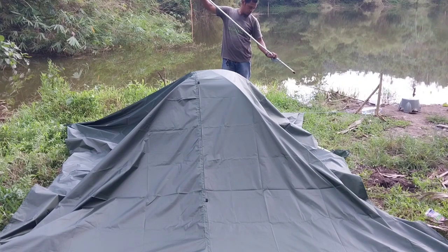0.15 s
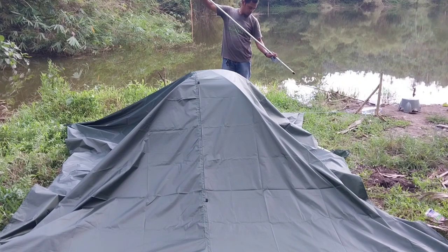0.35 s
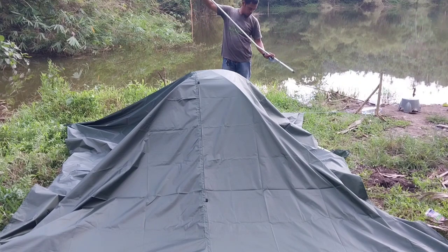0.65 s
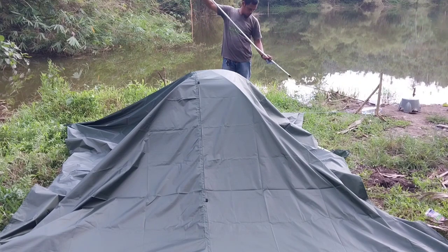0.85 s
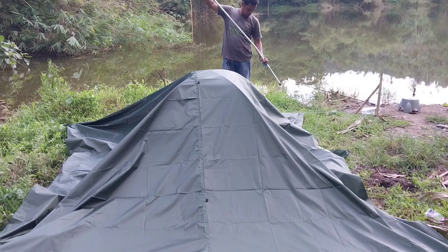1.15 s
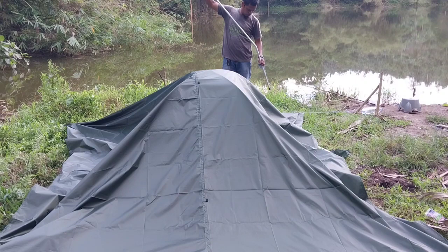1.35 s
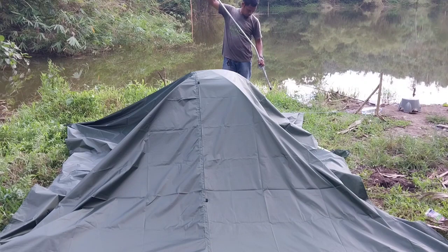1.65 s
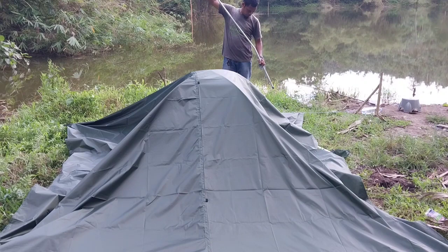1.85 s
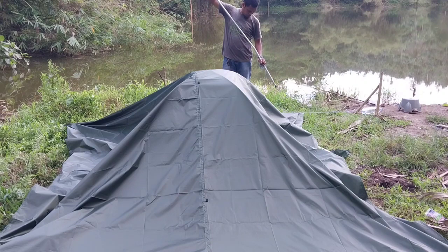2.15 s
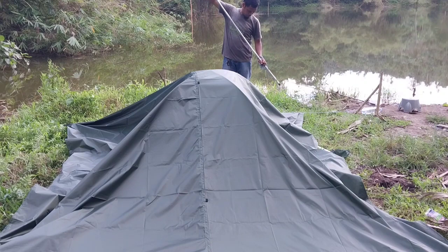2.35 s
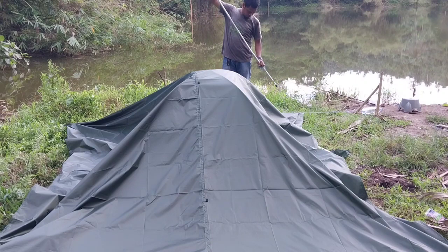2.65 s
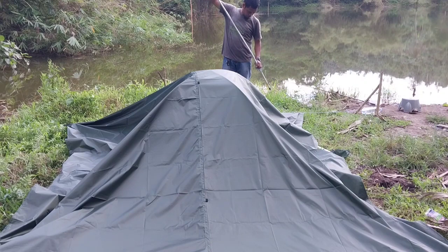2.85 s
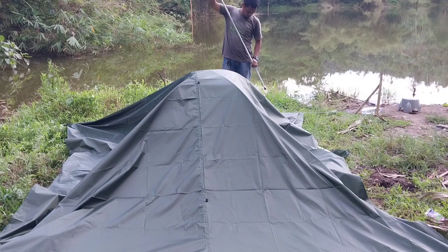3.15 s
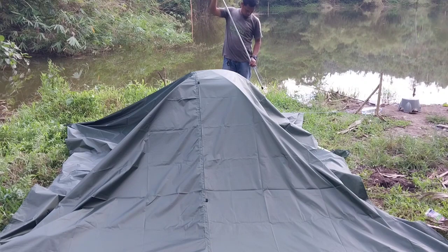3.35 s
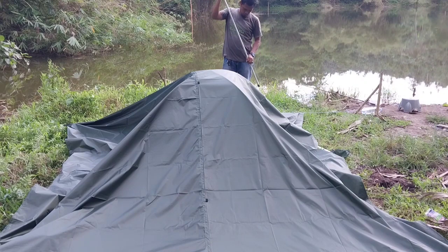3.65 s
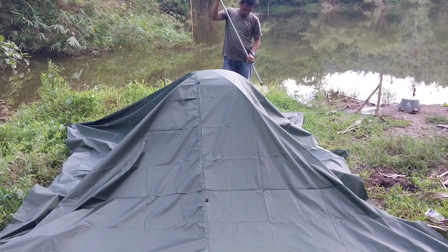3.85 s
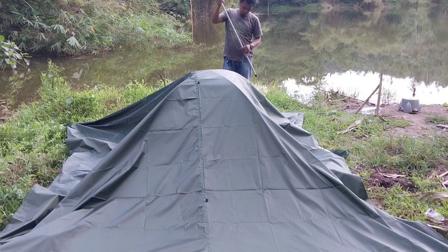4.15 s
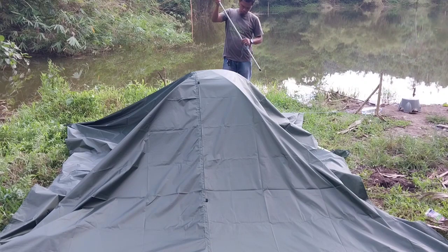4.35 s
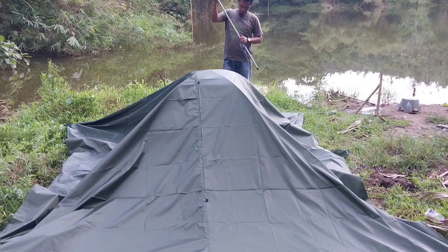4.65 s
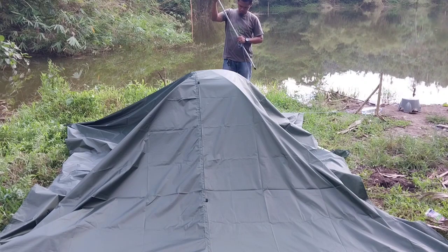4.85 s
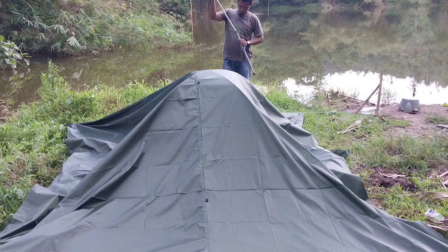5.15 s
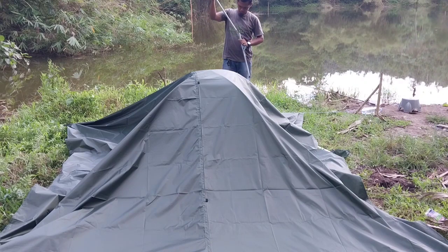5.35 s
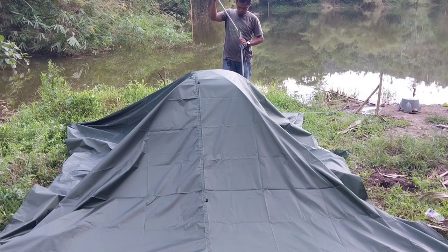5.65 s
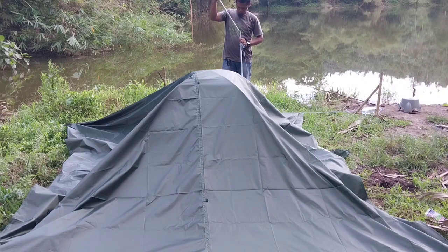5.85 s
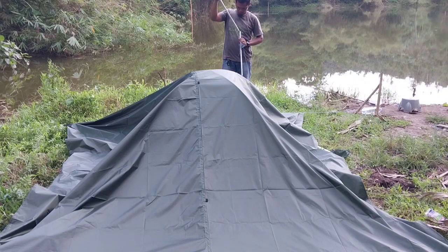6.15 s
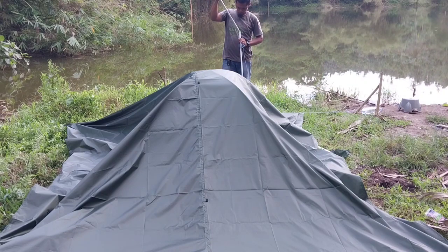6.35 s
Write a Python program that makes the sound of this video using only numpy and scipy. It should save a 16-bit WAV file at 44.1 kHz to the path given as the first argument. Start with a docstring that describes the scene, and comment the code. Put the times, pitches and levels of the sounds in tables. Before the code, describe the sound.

Outdoors at a lake shore, a bright cicada drone leans to one side over soft hiss, with a regular two-tone insect call and fine chirps. Tent pole sections snap together sharply near the start, again a second later, more dully midway, and crisply near the end. A rasping insect joins and pulses ever faster. Stereo microphone a few metres away, with a short echo from the trees.

```python
"""A lake shore in summer heat: from the start cicadas drone to the right in scattered clicks, over filtered-noise
hiss; other insects chirp and buzz, and a two-tone caller (grouped bursts) keeps time. Thin whistles (sines)
come and go from about 1.15 s. From about 1.2 s tent pole sections rub (soft noise) and snap together near 1.4, 2.4,
3.5 and 5.8 s: noise through joint and tube resonances, damped modes for the thuds, a noise tail for the trees'
answer. A pulsing rasper (noisy bursts) joins at about 2.6 s, its pulses drawing closer together."""
import sys
import numpy as np
from scipy import signal
from scipy.fft import rfft, irfft, next_fast_len
from scipy.io import wavfile
from scipy.ndimage import uniform_filter1d, map_coordinates

SR = 44100
rng = np.random.default_rng(int(sys.argv[2]) if len(sys.argv) > 2 else 0)


def to_wav(sig):
    """Store sig (one row per channel, or 1-D mono) as 16-bit WAV at the path in sys.argv[1].

    Samples outside -1..1 are clipped; the rate is SR.
    """
    pcm = np.clip(np.atleast_2d(sig), -1, 1) * 32767
    pcm = np.round(pcm).astype(np.int16)
    wavfile.write(sys.argv[1], SR, pcm.T)  # frames by channels


N = 287091


def amp(db):
    """Gain for a level in dB."""
    return 10 ** (np.asarray(db) / 20)


def unit(x):
    """x scaled to an RMS of one."""
    return x / np.sqrt(np.mean(x ** 2) + 1e-20)


def along(points, hz):
    """Each column after the frequency, read on a log axis."""
    f, *cols = np.transpose(points)
    return [np.interp(np.log(hz + 1), np.log(f + 1), c) for c in cols]


def curves(rows):
    """One value per sample for each column after the time."""
    s, *cols = np.transpose(rows)
    return [np.interp(np.arange(N) / SR, s, c) for c in cols]


def sides(db):
    """Left and right gain for a level difference; negative leans right."""
    return amp([[db / 2], [-db / 2]])


def filtered(x, response):
    """x times a complex response of frequency."""
    m = next_fast_len(x.shape[-1] + 8192)
    spectrum = rfft(x, m) * response(np.fft.rfftfreq(m, 1 / SR))
    return irfft(spectrum, m)[..., :x.shape[-1]]


def resonances(modes):
    """Causal response of a few (f/Hz, width/Hz, level/dB) modes, alternating in sign."""
    def response(f):
        total = 0
        for k, (centre, width, db) in enumerate(modes):
            damping = 1j * f * width
            total = total + (-1) ** k * amp(db) * damping / (centre * centre - f * f + damping)
        return total
    return response


def drift(depth_db):
    """A slow random swell of level, in dB, splined through random knots."""
    knots_per_s = 3
    knots = rng.standard_normal(int(N * knots_per_s / SR) + 4)
    return depth_db * map_coordinates(knots, [np.arange(N) * knots_per_s / SR])


def phrases(rows, length):
    """Gain of a song that starts and stops: round-shouldered swells centred on each (t/s, level/dB)."""
    t = np.arange(N) / SR
    return sum(amp(db) * np.exp(-(2 * (t - s) / length) ** 4) for s, db in rows)


def shore():
    """Distant insects, leaves and rumble merge into a gently patchy hiss of shaped noise."""
    # spectrum of the far shore: f/Hz, relative level/dB per Hz, left-right/dB, left-right likeness (-1 to 1)
    far_spectrum = [(15, -30, 0, .2), (29.8, 1.5, -4, 0.22), (70.6, 4, -1.5, 0.21), (226, -1, 0, 0.15),
                    (440, -11, -1.5, 0.21), (1480, -13.5, -1, -0.34), (1823, 0.5, 2, 0.18),
                    (2550, -9.5, 4, 0.4), (3750, 1, -1, 0.27), (4350, 6, -2.5, -0.025),
                    (6430, 2.5, -0.5, 0.051), (10500, 0.5, -4.5, -0.063), (16200, 2.5, 1.5, 0.14)]
    mean_db, drift_db = -43.5, 0.78
    z = signal.stft(rng.standard_normal((2, N)), nperseg=512)[2]
    # patches: random levels smoothed over frequency, then over time
    patches = uniform_filter1d(rng.standard_normal(z.shape[1:]), 4, 0)
    patches = uniform_filter1d(patches, 10, 1)
    pair = signal.istft(z * amp(1.8 * unit(patches)), nperseg=512)[1][:, :N]

    def mid_side_shape(hz):
        level, _, likeness = along(far_spectrum, hz)
        turn = np.arccos(np.clip(likeness, -1, 1)) / 2
        return amp(level) * [np.cos(turn), np.sin(turn)]

    def lean(hz):
        return amp(np.outer([.5, -.5], along(far_spectrum, hz)[1]))

    mid, side = filtered(pair, mid_side_shape)
    hiss = filtered(np.array([mid + side, mid - side]), lean)
    return amp(mean_db + drift(drift_db)) * unit(hiss)


def chorus(songs, scatter_db):
    """Many singers out of step: short tone bursts, strewn at random for each ear separately."""
    out = np.zeros((2, N))
    for hz, spread_hz, life, rate, db, pan_db in songs:
        when, pitch, size = rng.standard_normal((3, 2, int(rate * N / SR), 1))
        start = (np.abs(when) * 1e7 % N).astype(int)  # wrapped into an even spread
        k = np.arange(int(life * SR))
        tone = np.sin(2 * np.pi * (hz + spread_hz * pitch) * k / SR)
        burst = amp(scatter_db * size) * tone * np.hanning(len(k))
        ears = [np.bincount((s + k).ravel(), b.ravel(), N + len(k))[:N] for s, b in zip(start, burst)]
        out += amp(db) * sides(pan_db) * np.array([unit(e) for e in ears])
    return out


def low_chorus():
    """Lower-pitched insects blend many short bursts into a slowly swelling bed."""
    # songs: f/Hz, pitch spread/Hz, burst length/s, bursts per s, relative level/dB, left-right/dB
    songs = [(2193, 41.5, 0.012, 200, 1, -3.5), (1978, 170, 0.0077, 300, -6.5, -5),
             (2362, 74, 0.011, 200, -7.5, -2), (3131, 61, 0.0093, 200, 2.5, -3),
             (3327, 64, 0.0087, 200, 3.5, -2), (5325, 424, 0.0027, 1000, 8, 1.5)]
    return amp(-63.5 + drift(0.85)) * chorus(songs, scatter_db=2)


def whines():
    """Thin high singers: overlapping bursts of narrow pitch spread hold steady tones."""
    # songs: f/Hz, pitch spread/Hz, burst length/s, bursts per s, relative level/dB, left-right/dB
    songs = [(10930, 20, .025, 100, -2, -8), (12560, 30, .02, 100, 0, -8), (13720, 25, .02, 100, 0, -8),
             (15270, 90, .008, 200, 8, -4)]
    return amp(-68.5) * chorus(songs, scatter_db=2)


def whistle():
    """Far singers of thin tones: sines with their octaves, in phrases."""
    # mid-phrase t/s, length/s, f/Hz, level/dB, octave above relative to the tone/dB
    notes = [(1.42, .56, 5694, -59, -3), (2.3, .8, 5457, -68, 3), (4.08, .56, 5690, -65, -3),
             (5.27, .95, 5475, -62, -5), (6.42, .56, 5694, -63, -3)]
    turn = 2 * np.pi * np.arange(N) / SR
    out = np.zeros((2, N))
    for s, length, hz, db, octave_db in notes:
        tone = np.sin(hz * turn) * sides(-3)
        octave = amp(octave_db) * np.sin(2 * hz * turn) * sides(-6)
        out += phrases([(s, db)], length) * (tone + octave)
    return out


def cicadas():
    """Dense overlapping clicks fuse into a drone that leans right."""
    # songs: f/Hz, pitch spread/Hz, click length/s, clicks per s, relative level/dB, left-right/dB
    songs = [(8000, 323, 0.0046, 3000, -0.5, -5), (7904, 137, 0.0057, 500, -6.5, -10),
             (6627, 76, 0.0096, 600, -16, -0.5)]
    return amp(-42.5 + drift(0.2)) * chorus(songs, scatter_db=.5)


def caller():
    """A two-tone singer keeps time: its bursts are gated into regular calls."""
    # songs: f/Hz, pitch spread/Hz, burst length/s, bursts per s, relative level/dB, left-right/dB
    songs = [(3098, 16, 0.046, 80, -0.91, -1.2), (3277, 8.8, 0.035, 89, -0.4, -1.6)]
    # strength of the calls: t/s, level/dB
    strength = [(0, -61), (1.4, -57), (3, -58), (4.15, -55), (6.51, -56)]
    first_s, every_s, length_s = 0.21, .559, 0.3
    beats = np.arange(first_s, N / SR, every_s)
    levels_db = np.interp(beats, *np.transpose(strength))
    return phrases(zip(beats, levels_db), length_s) * chorus(songs, scatter_db=2)


def rasper():
    """A pulsing singer: rough, wide-pitched bursts gated into short rasps."""
    # songs: f/Hz, pitch spread/Hz, burst length/s, bursts per s, relative level/dB, left-right/dB
    songs = [(4960, 9.4, 0.015, 100, -18, 8), (5340, 370, 0.0064, 1000, -8, 0.5),
             (9400, 1030, 0.0033, 730, -10, -3)]
    # rasps, drawing closer together: middle t/s, level/dB
    pulses = [(2.65, -46.5), (3.17, -45), (3.65, -42), (4.16, -41), (4.6, -43.5), (5.03, -43), (5.4, -44.5),
              (5.72, -44), (6.06, -43.5), (6.44, -45)]
    return phrases(pulses, length=.18) * chorus(songs, scatter_db=3.5)


def katydids():
    """One on each side: wing hiss that jumps up and decays at each stroke."""
    # left singer, then right: strokes per s, relative level/dB
    singers = [(57.2, -57), (59.2, -54.5)]
    # hiss of the wings: f/Hz, relative level/dB per Hz
    wing_spectrum = [(9000, -35), (11500, -23), (13500, 6), (15200, -5), (16000, -19)]
    rate, db = np.transpose(singers)[:, :, None]
    stroke = (rate * np.arange(N) / SR) % 1
    hiss = filtered(rng.standard_normal((2, N)), lambda hz: amp(along(wing_spectrum, hz)[0]))
    return amp(db) * unit(hiss * np.exp(-2.5 * stroke))


def cricket():
    """One near singer: narrow resonant noise makes a hoarse tone, sounded once a wing beat."""
    # the singer: f/Hz, level/dB, left-right/dB
    hz, db, pan_db = (7430, -57.5, -6)
    # pace: t/s, chirps per s
    pace = [(0, 16.4), (3.1, 16.4), (3.4, 16.8), (4.6, 16.8), (4.9, 16.4), (6.51, 16.5)]
    beat = np.cumsum(curves(pace)[0]) / SR + .45
    gate = np.clip(np.cos(2 * np.pi * beat) + .2, 0, 1)
    wing = resonances([(hz, 120, 0)])
    tone = filtered(rng.standard_normal((2, N)), lambda f: wing(f) ** 2)
    return amp(db) * sides(pan_db) * unit(gate * tone)


def scuffs():
    """Hands and pole ends brushing past: short swells of dull, half-pitched noise."""
    # soft rubs and bumps: middle t/s, length/s, f/Hz, width/Hz, level/dB
    rubs = [(1.24, 0.16, 900, 500, -70), (3.618, 0.12, 1850, 700, -60), (4.64, 0.075, 830, 200, -61.5),
            (5, 0.11, 292, 60, -65), (5.195, 0.048, 462, 80, -62.5), (5.188, 0.027, 1000, 900, -66)]
    out, t = np.zeros((2, N)), np.arange(N) / SR
    for s, length, hz, width, db in rubs:
        body = resonances([(hz, width, 0)])
        noise = filtered(rng.standard_normal((2, N)), lambda f: body(f) ** 2)
        out += amp(db) * np.exp(-(2 * (t - s) / length) ** 2) * unit(noise)
    return out


def trees(x):
    """Scattered answer of bank and trees: a noise tail; each frequency dies at its own speed."""
    # decay of the tail: f/Hz, t60/s
    decay = [(150, 0.19), (1000, 0.26), (5000, 0.19), (14000, 0.12)]
    hz, t, z = signal.stft(rng.standard_normal((2, SR // 3)), SR, nperseg=256)
    t60 = along(decay, hz)[0][:, None]
    tail = signal.istft(z * amp(-60 * t / t60), SR, nperseg=256)[1]
    late = np.pad(x, ((0, 0), (250, 0)))  # answers 250 samples late
    return signal.fftconvolve(late, tail / np.linalg.norm(tail[0]), axes=1)[:, :N]


def ring(modes, t):
    """Damped modes with a soft start."""
    onset = 1 - np.exp(-t / 0.0042)
    return onset * sum(amp(db - 60 * t / t60) * np.sin(2 * np.pi * hz * t) for hz, db, t60 in modes)


def thuds():
    """As a section seats the whole pole flexes; where it is held decides how each mode family swings."""
    # seatings: t/s, then gain/dB of slow swing, main flex, quick flex and dull tap
    seatings = [(1.3679, -24, -19.5, -40, -30.5), (2.4114, -28.5, -28, -40.5, -38.5),
                (3.4530, -33, -27, -38, -50), (3.6, -40.5, -47, -53, -54),
                (5.845, -29.5, -37.5, -44.5, -36)]
    # the four mode families in that order, each a list of: f/Hz, relative level/dB, t60/s
    families = [
        [(101.6, -12.5, 0.16), (147.5, -2, 0.051)],
        [(194, -8.5, 0.081), (228, -.5, .045), (279, -11.5, 0.043)],
        [(344.4, -5.5, .14)],
        [(480, 1.5, .025)],
    ]
    out, t = np.zeros(N + SR), np.arange(SR // 3) / SR
    for s, *levels_db in seatings:
        flex = sum(amp(db) * ring(modes, t) for db, modes in zip(levels_db, families))
        out[round(s * SR):][:len(t)] += flex
    return out[:N]


def snaps():
    """Each contact is a short noise rattle through the joint, its high ring and the hollow tube."""
    # contacts: middle t/s, rattle half-length/s, joint f/Hz, joint peak level/dB,
    # high ring peak level/dB, tube knock f/Hz, knock peak level/dB
    contacts = [(1.363, 0.0033, 3980, -32, -32, 2000, -40), (1.3656, 0.0016, 4470, -23, -20, 1000, -38),
                (1.3678, 0.00078, 3930, -23, -19, 810, -30),
                (1.3697, .00043, 5930, -14.5, -32, 2000, -23.5),
                (2.4035, 0.0019, 5000, -37, -27, 2000, -49), (2.408, .0022, 5000, -35, -24, 800, -42),
                (2.412, 0.0043, 4870, -25.5, -29, 2140, -34.5), (3.453, .0012, 3800, -37, -36, 600, -48),
                (3.599, .003, 3030, -47, -52, 1910, -38), (3.613, .0015, 3250, -33, -52, 1800, -35),
                (5.832, 0.0014, 4600, -22.5, -46, 2000, -52), (5.839, 0.0032, 4600, -27, -23.5, 900, -45),
                (5.8434, 0.0015, 4530, -22, -18, 1390, -34.5), (5.8453, .0012, 6500, -22, -18, 910, -40)]
    # high ring of the metal joint: f/Hz, width/Hz, relative level/dB
    high_ring = [(9560, 9500, -11), (12430, 2000, -1), (15100, 2600, -12.5)]
    out = np.zeros((2, N + SR))
    around = np.arange(-500, 1500)  # samples about the middle of the rattle
    for s, length, joint_hz, joint_db, bright_db, knock_hz, knock_db in contacts:
        swell = np.exp(-(around / SR / length) ** 2)
        chatter = rng.standard_normal((3, 2, len(around))) * swell
        joint = [(joint_hz, 0.45 * joint_hz, 0)]
        tube = [(knock_hz, 1.45 * knock_hz, 0)]
        for noise, modes, db in zip(chatter, (joint, high_ring, tube), (joint_db, bright_db, knock_db)):
            body = resonances(modes)
            sound = filtered(noise, lambda f: body(f) ** 2)
            out[:, round(s * SR) + around] += amp(db) * sound / np.abs(sound).max(axis=1, keepdims=True)
    return out[:, :N]


def scene():
    """Insects and shore around the pole; the long waves of the thuds scatter little."""
    insects = low_chorus() + whines() + whistle() + cicadas() + caller() + rasper() + katydids() + cricket()
    rattle, flex = snaps(), thuds()
    scattered = trees(amp(-7) * rattle + amp(-13.5) * flex)
    pole = rattle + flex * sides(-1.3) + scattered + scuffs()
    return shore() + insects + pole


def record(dry):
    """The microphone drops the deepest bass; nothing above the band limit passes."""
    top_hz = 15500
    bass_cut = signal.butter(2, 60, "high", fs=SR, output="sos")
    return filtered(signal.sosfilt(bass_cut, dry), lambda hz: hz < top_hz)


dry = scene()
out = record(dry)
to_wav(out)
```